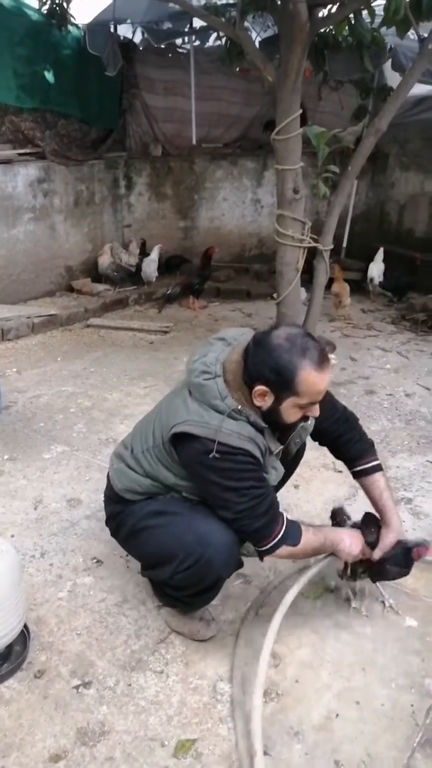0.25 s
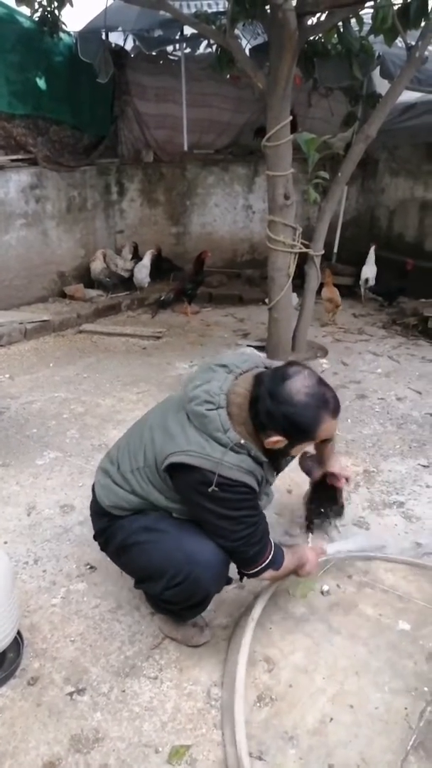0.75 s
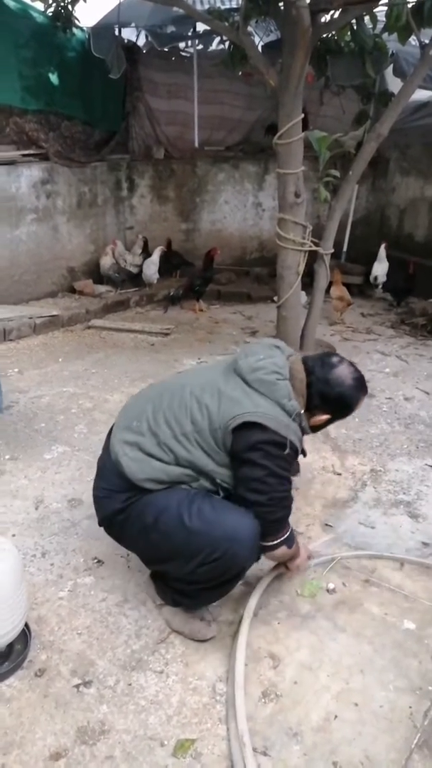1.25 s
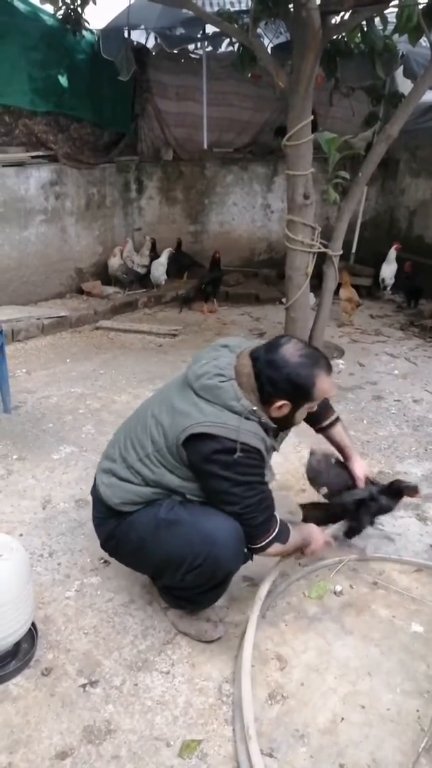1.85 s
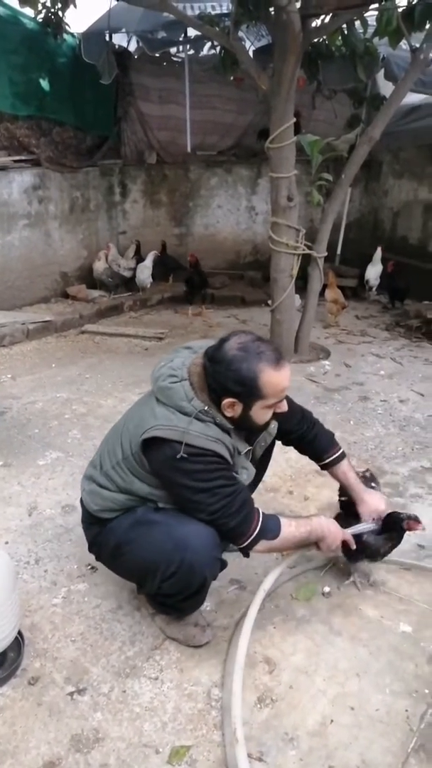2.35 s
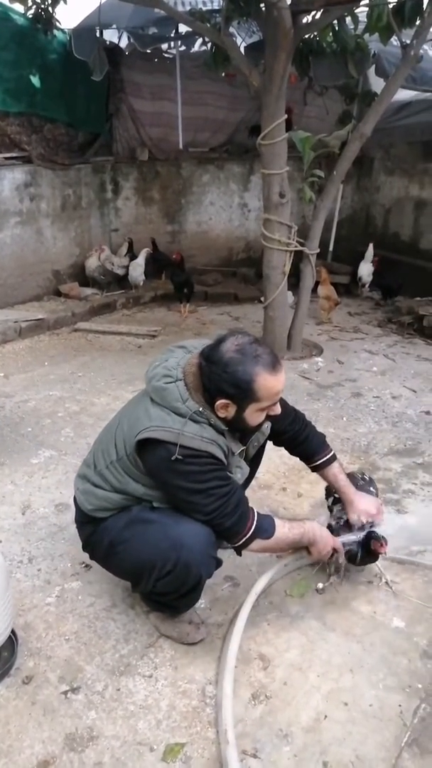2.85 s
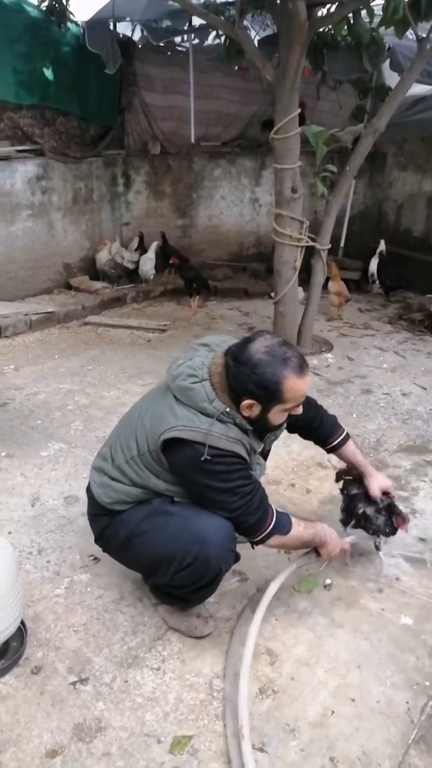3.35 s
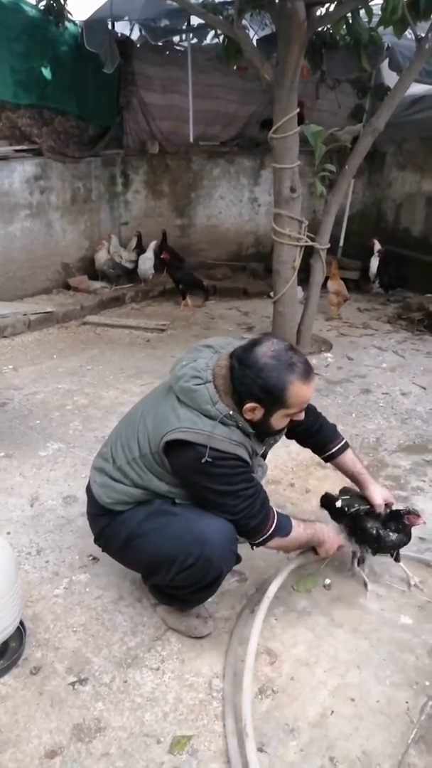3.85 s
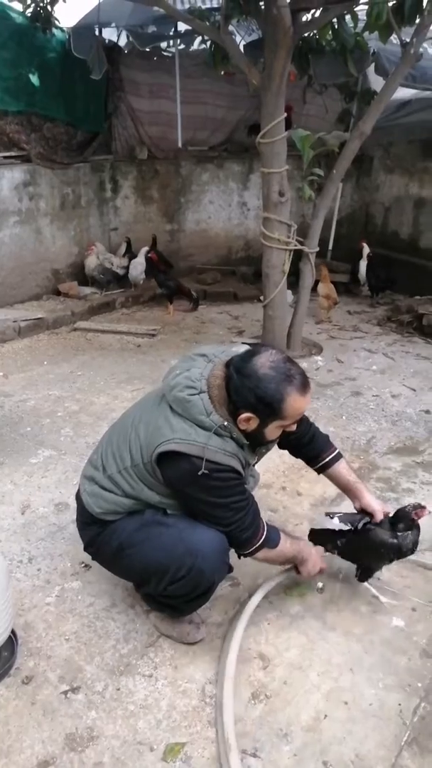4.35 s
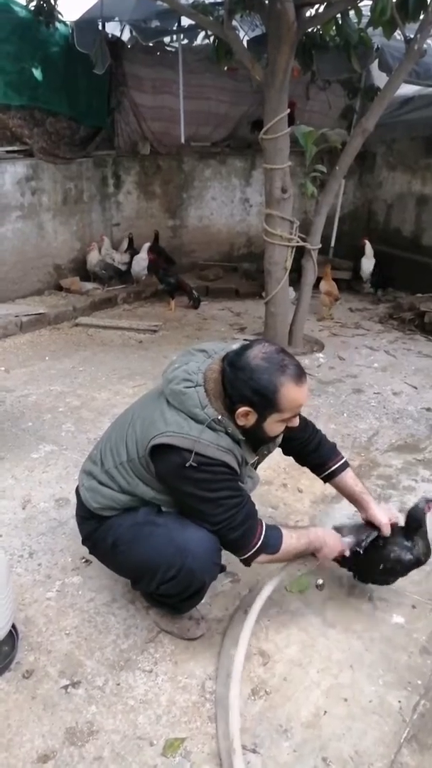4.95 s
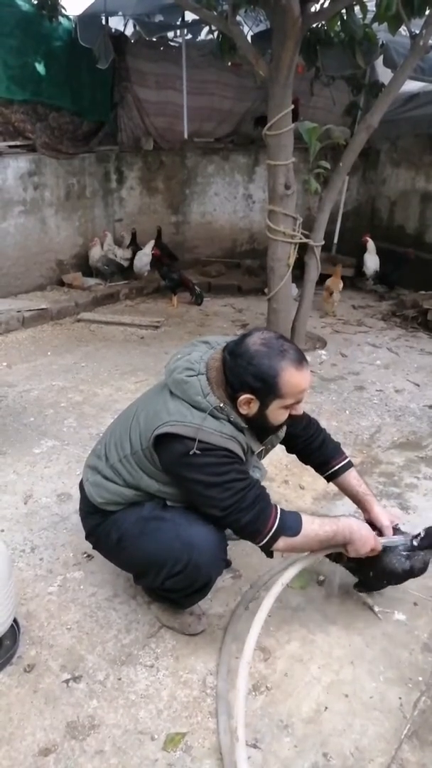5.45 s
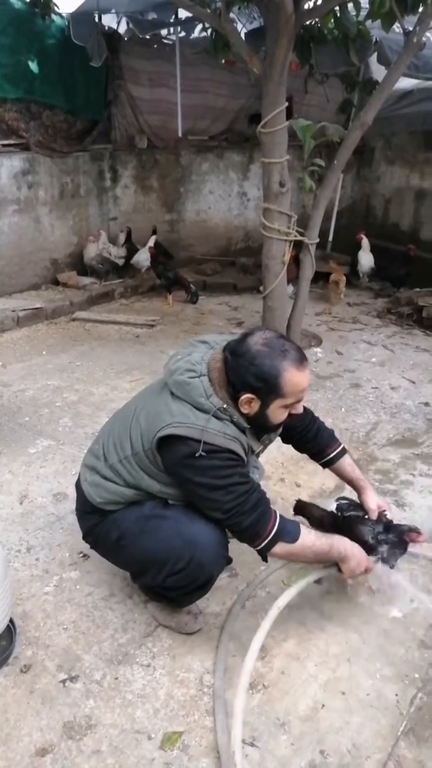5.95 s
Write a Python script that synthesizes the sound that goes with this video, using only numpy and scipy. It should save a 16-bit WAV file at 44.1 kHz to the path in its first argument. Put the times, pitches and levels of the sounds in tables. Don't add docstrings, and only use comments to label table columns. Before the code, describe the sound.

In a small walled yard, a hen close to the microphone squawks loudly, clucks in quick runs and squawks again, rough and rattling. A hose jet hisses throughout, swelling into brief spatters on concrete. Drops crack, wet squirts squeak, more hens call softly further off, and distant traffic rumbles below.

```python
import sys
import numpy as np
from scipy import signal
from scipy.fft import rfft, irfft, next_fast_len
from scipy.io import wavfile

SR = 44100
rng = np.random.default_rng(int(sys.argv[2]) if len(sys.argv) > 2 else 0)


def rack_gain(trim_db):
    fader = np.asarray(trim_db, float)
    return 10 ** (fader / 20)


def int16_out(signal):
    q = np.round(np.clip(np.atleast_2d(signal).T, -1, 1) * 32767)
    wavfile.write(sys.argv[1], SR, q.astype(np.int16))


N = 273861

# time_s, effort_db, pitch_hz, beak_gape_db
SQUAWKS = [
    [(0.58, -41, 586, -16), (0.605, -64, 652, -18), (0.63, -41, 655, -2), (0.7, -37, 653, -1),
     (0.78, -39, 660.7, 2.5), (0.845, -38, 647, -7)],
    [(1.15, -64, 535.4, -2), (1.22, -51, 512, 0.5), (1.3, -53, 532.7, 5.5), (1.37, -48.5, 517, 5.5),
     (1.45, -51.5, 506.7, -17)],
    [(2.07, -48.5, 578, 10.5), (2.13, -46, 562.7, 2), (2.18, -42, 494, 6), (2.22, -43.5, 550, -3.5),
     (2.27, -44, 563, 2), (2.315, -47.5, 474, -16)],
    [(2.985, -48, 670, -19), (3.02, -40, 625, -21), (3.1, -40.5, 594, -12), (3.2, -36.5, 584, -8),
     (3.35, -38, 630.3, 11), (3.44, -36, 627, 2), (3.52, -53, 584, -6)],
    [(4.32, -70, 559, -8), (4.34, -42, 554, -18), (4.4, -44, 542, 3.5), (4.52, -44.5, 558.7, 8),
     (4.61, -43, 579.7, -19), (4.655, -53, 592, -19)],
    [(6.06, -41, 575, -34), (6.09, -39.5, 709.5, 2.5), (6.15, -42, 670, 4), (6.21, -40, 602, -1.5)],
]
SQUAWK_HOARSENESS = [.55, .28, .6, .45, .25, .3]
# throat_over_chest_db, beak_over_chest_db, beak_hz, shrill_under_beak_db
SQUAWK_TRACT = [(7.5, 12, 2480, -26), (12.5, 16, 2050, -9.5), (8.5, -2.5, 2280, -14), (1, 0, 2140, -28),
                (7.5, -0.5, 2200, -21.5), (6.5, 8, 2290, -46)]
# beak_width_below_hz, beak_width_above_hz, whistle_over_shrill_db, upper_beak_db
SQUAWK_COLOUR = [(280, 200, 0, -20), (170, 350, -34, -10), (600, 400, -18, -12), (600, 400, 3, -12),
                 (260, 250, -12, -20), (500, 400, -10, -14)]
# rate_per_s, one_pulse_s, level_swing_db, pitch_swing_share, every_other_pulse_db, uneven_rad
SQUAWK_RATTLE = [(51.5, .726, 4.5, .05, 0.1, .35), (45, 1.305, 3.0, .012, 0.1, .8),
                 (40, 2.18, 5.0, .05, 0.1, 1.0), (55, 3.347, 5.0, .04, 0.1, .6),
                 (46, 4.502, 6.5, .03, 2.5, .25), (46.5, 6.166, 4.5, -.09, 0.1, .25)]
REST_COLOUR = (560, 380, -6, -15)
REST_RATTLE = (47, 0.0, 4.5, .035, 0.1, .8)

# peak_s, chest_db, pitch_hz, throat_over_chest_db, beak_over_chest_db
CLUCKS = [(0.183, -37, 612, 11, 2.5), (.63, -47, 736, 16.5, 12), (.872, -47.5, 493, 13, 20.5),
          (.897, -48, 487.4, 18, 20.5), (1.617, -27.5, 461, -3.5, -2.5), (1.728, -31.5, 550, 7, 4),
          (1.892, -27, 547.3, 5.5, 0.5), (2.025, -34, 597.3, 9.5, 7.5), (2.339, -28.5, 475.7, -1, -9.5),
          (2.835, -39, 782, -46, -42), (2.866, -34.5, 764, -17, -28), (3.752, -36, 598, -34, -18),
          (4.09, -36, 477.5, -40, -40), (4.248, -37, 530, 10.5, -6), (4.311, -40.5, 542, 12.5, -3),
          (4.68, -36.5, 568, 2.5, 3.5), (4.745, -33.5, 654.4, 1, 7), (4.803, -34.5, 701, 6, 6.5),
          (4.862, -42.5, 485, 14, 10.5), (4.979, -33.5, 691, 12, 2), (5.01, -45, 590.5, 20.5, 6.5),
          (5.952, -41, 695.5, 10, 5.5), (5.972, -33, 693.6, 0, -4), (5.985, -53, 560, 16, 1)]
CLUCK_HOARSENESS = [.55, .3, .5, .35, .55, .55, .55, .45, .3, .4, .35, .55, .7, .35, .5, .3, .6, .65, .65,
                    .65, .7, .2, .2, .2]
CLUCK_BEAK_HZ = [2350, 2580, 2470, 1826, 2450, 2160, 2260, 2350, 2335, 2335, 2335, 2335, 2335, 2100, 2335,
                 2160, 2360, 2200, 2335, 2100, 2335, 2750, 2060, 2335]
YELPS = [
    (0.114, -58, 638, 30.5, 14.5),
    (4.159, -55.5, 571, 28.5, -9),
    (5.459, -53.5, 572, 29.9, 0),
]
YELP_HOARSENESS = 0.36

# start_s, length_s, chest_db, pitch_hz, throat_over_chest_db
OTHER_HEN = [(1.23, 0.2, -45, 688, 5), (1.45, 0.17, -48, 588, 8.5), (1.63, 0.59, -46, 670, 2),
             (4.35, .33, -38.5, 670, -8), (4.72, 0.24, -44, 710, 8), (2.52, 0.064, -64, 740, 18),
             (2.54, 0.29, -75, 370, -38), (3.82, 0.34, -54, 530, -17), (3.74, .12, -101, 784, 13),
             (4.2, 0.183, -63, 817, -11), (1.07, 0.11, -61.5, 480, 1), (.15, 0.105, -42, 700, -8),
             (5.5, 0.13, -52, 710, -3), (2.36, 0.078, -53.5, 470, 0), (3.0, 0.315, -55, 830, -13)]
OTHER_BEAK_DB = [8.5, 6, -4.5, -4, -17, 12, -12, -14.5, 10, 11.5, 11.5, -15, -18, -4, -6]
OTHER_BEAK_HZ = [2750, 2350, 2335, 2100, 2335, 2335, 2335, 2335, 2335, 2460, 2335, 2335, 2335, 2335, 2335]
OTHER_HOARSENESS = [.5, .5, .8, .45, .6, .95, .15, .85, .3, .3, .95, .6, .9, .25, .7]

# rise_s, rise_db, hold_s, hold_loss_db, fall_s, fall_loss_db
CLUCK_SHAPE = (.014, 11, 0.013, 7.0, 0.045, 15)
YELP_SHAPE = (.02, 7.0, .04, -13.0, .022, 14.0)
MURMUR_SHAPE = (.03, 4.6, 0.707, 0.82, 0.31, 6.6)
# throat_hold_db, throat_fall_db, beak_hold_db, beak_fall_db
CLUCK_CLOSING = (2.0, 6.5, 5, 20)
YELP_CLOSING = (20.0, 8.0, 12.0, 8.0)
CLUCK_ARCH = (.1, .04, .16)
YELP_ARCH = (-.01, .15, .26)
MURMUR_ARCH = (.02, .0, .02)

# time_s, level_db
JET = [(0, -44.5), (.3, -42), (.6, -41), (.9, -47.5), (1.14, -38), (1.45, -45.5), (1.8, -49.5), (2.2, -42),
       (2.36, -45), (2.6, -39.5), (3.1, -41.5), (3.55, -38), (4.18, -44), (4.4, -42.5), (4.64, -48),
       (5.1, -45.5), (5.5, -46), (6.21, -42)]
# time_s, half_length_s, spatter_db, spray_db
SWEEPS = [(0.006, 0.045, 10.5, 6.5), (0.198, 0.09, 11, 10), (0.48, 0.095, 7, 1.5), (0.623, 0.026, 9.5, -3),
          (0.788, 0.14, 1, 4.5), (0.969, 0.032, 6.5, 11), (1.152, 0.044, 6, 3), (1.3, 0.066, -4, -7),
          (1.376, 0.06, 7, 1), (1.596, 0.09, 7, 6.5), (1.728, 0.05, 12, 1), (1.905, 0.033, 9, 2),
          (2.03, 0.038, 14.5, 9), (2.247, 0.047, 6, 6), (2.587, 0.032, 5.5, 9), (4.252, 0.0075, -5, -8),
          (4.747, 0.036, 8, 12.5), (4.855, 0.054, 6, 5), (5.323, 0.15, 11.5, 12), (5.383, 0.024, -9.5, -13),
          (5.438, 0.038, -8, -2), (5.733, 0.13, 8, 14), (5.864, 0.094, -4, -3.5), (6.023, 0.091, 10.5, 14)]
# frequency_hz, level_db_per_hz
SPATTER = [(900, -10.5), (1400, -10), (1900, -7), (2500, -1.5), (3200, -1.5), (4200, -8), (5100, -4),
           (6000, 12.5), (7000, -4.5), (8300, -5.5), (9000, -22)]
SPRAY = [(8300, -30), (9500, 1), (10800, -13), (12000, -4), (13800, -14.5), (14900, -5.5), (15500, -5.5),
         (16000, -10)]
# time_s, peak_db, sharpness_db
DROPS = [(0.076, -53, -33), (0.16, -23, -28), (0.607, -40, -56), (0.9477, -33.5, 8), (1.2445, -31, -45),
         (1.9008, -31, -29), (2.021, -33, -29), (2.4315, -29.5, -30), (2.5438, -34, -18),
         (2.6212, -28, -29), (3.588, -39, -20), (3.647, -46, -20), (4.714, -42, -21), (4.794, -52, -34),
         (5.0777, -33.5, -20), (5.267, -25, -20), (5.6717, -29, -11), (5.992, -46, -25),
         (6.055, -24.5, -31)]
# time_s, length_s,
# start_hz, end_hz, level_db
SQUIRTS = [(0.041, 0.023, 3250, 3300, -37), (2.81, 0.063, 3000, 5000, -41), (4.79, 0.1, 4800, 5150, -42.5),
           (0.598, 0.018, 5900, 4500, -42), (5.635, 0.0257, 2600, 1300, -52),
           (3.89, 0.091, 2800, 2600, -53.5), (4.78, 0.078, 3900, 4300, -43),
           (3.745, 0.024, 422, 374, -45.5), (4.07, 0.0468, 530, 295, -43), (3.1, 0.0593, 560, 600, -52.5),
           (3.15, 0.057, 460, 510, -42.5), (.97, .03, 348, 175, -51.5), (4.6, 0.0205, 1750, 1550, -53),
           (.065, .05, 4600, 5050, -40), (0.066, .045, 3950, 4350, -41.5), (0.027, 0.026, 5000, 4850, -45),
           (5.928, .012, 1040, 1080, -37), (4.44, 0.124, 4200, 4200, -54), (.61, 0.0058, 1640, 1500, -24),
           (5.966, 0.0223, 1370, 1060, -33)]
SQUIRT_WIDTHS_HZ = [120, 500, 130, 90, 220, 350, 450, 40, 40, 50, 30, 30, 90, 160, 130, 150, 60, 300, 25,
                    25]

# frequency_hz, level_db_per_hz
RUMBLE = [(12, -39), (20, -1), (97, 2), (141, 4), (195, -5), (394, -2), (501, -5.5), (730, -7.5),
          (809, -14.5), (1200, -11), (1560, -16.5), (2640, -120)]
# time_s, level_db
PUMP = [
    (0, -50),
    (1.0, -62),
    (1.95, -51),
    (2.1, -99),
    (3.8, -104),
    (3.95, -43),
    (4.4, -52),
    (5.5, -48),
    (6.21, -52.5),
]
# time_s, firing_hz, level_db
ENGINES = [
    [(0.0, 139, -51), (0.88, 152.4, -54.5), (1.0, 133, -48)],
    [(0.95, 129.4, -62), (1.366, 129.6, -47.5), (2.35, 136.5, -54.5)],
    [(2.6, 149, -78), (2.734, 133.3, -65), (3.5, 150.8, -61)],
    [(3.7, 153, -59), (3.938, 150.3, -55), (4.3, 123, -52.5)],
]

# frequency_hz, left_over_right_db
PORTS = [(70, -0.5), (99, -1), (160, -0.5), (270, -2), (450, 1.5), (740, -4.5), (1220, -1.5), (2010, -10),
         (3330, -5), (5500, -15), (9080, 0.5), (15000, -19)]
# frequency_hz, likeness_0_to_1
LIKENESS = [(60, 1), (300, 1), (700, 0.96), (1200, 0.4), (3000, 0), (5500, 0.06), (9000, 0), (15000, 0.37)]

BEAK_REST_HZ, CLUCK_SHRILL_DB = 2335, -21.5
THROAT_REST_HZ, THROAT_FOLLOWS = 1180, 0.53
GAPE_RAISES_HZ = 16
SPRAY_UNDER_DB, SPRAY_FOLLOWS = 13.5, 0.87
RUMBLE_DB, PUMP_HZ = -55, 100.6
YARD_T60_S, WALL_CUT_HZ, YARD_DB = 0.2, 8800, -5
LEFT_LAG = 6
TOP_HZ = 15760


def hens():
    out = np.zeros(N)
    for voice in [*squawks(), *clucks_and_yelps(), *far_murmurs()]:
        first, sound = call(*voice)
        out[first:first + len(sound)] += sound
    return signal.sosfilt(signal.butter(5, 480, "high", fs=SR, output="sos"), out + 1e-18)


def squawks():
    calls = zip(SQUAWKS, SQUAWK_TRACT, SQUAWK_HOARSENESS, SQUAWK_COLOUR, SQUAWK_RATTLE)
    return [(squawk_rows(rows, *tract[:3]), hoarse, tract[3], colour, rattle)
            for rows, tract, hoarse, colour, rattle in calls]


def clucks_and_yelps():
    rest = CLUCK_SHRILL_DB, REST_COLOUR, REST_RATTLE
    voices = []
    for row, beak_hz, hoarse in zip(CLUCKS, CLUCK_BEAK_HZ, CLUCK_HOARSENESS):
        rows = shaped_rows(*row, beak_hz, CLUCK_SHAPE, CLUCK_CLOSING, CLUCK_ARCH)
        voices.append((rows, hoarse, *rest))
    for row in YELPS:
        rows = shaped_rows(*row, BEAK_REST_HZ, YELP_SHAPE, YELP_CLOSING, YELP_ARCH)
        voices.append((rows, YELP_HOARSENESS, *rest))
    return voices


def far_murmurs():
    voices = []
    calls = zip(OTHER_HEN, OTHER_BEAK_DB, OTHER_BEAK_HZ, OTHER_HOARSENESS)
    for (s, length_s, db, hz, throat_db), beak_db, beak_hz, hoarse in calls:
        rows = shaped_rows(s, db, hz, throat_db, beak_db, beak_hz,
                           MURMUR_SHAPE, np.zeros(4), MURMUR_ARCH, length_s)
        voices.append((rows, hoarse, CLUCK_SHRILL_DB, REST_COLOUR, REST_RATTLE))
    return voices


def squawk_rows(rows, throat_db, beak_db, beak_hz):
    return [(s, db, throat_db, beak_db + gape, hz, beak_hz + GAPE_RAISES_HZ * gape)
            for s, db, hz, gape in rows]


def shaped_rows(s, db, hz, throat_db, beak_db, beak_hz, shape, closing, arch, stretch=1):
    rise_s, rise_db, hold_s, hold_db, fall_s, fall_db = shape
    times = s + np.cumsum([-rise_s, rise_s, hold_s * stretch, fall_s * stretch])
    chest = db - np.array([rise_db, 0, hold_db, hold_db + fall_db])
    throat = throat_db - np.cumsum([0, 0, closing[0], closing[1]])
    beak = beak_db - np.cumsum([0, 0, closing[2], closing[3]])
    pitch = hz * (1 - np.insert(arch, 1, 0))
    return np.transpose([times, chest, throat, beak, pitch, np.full(4, beak_hz)])


def call(rows, hoarse, shrill_db, colour, rattle):
    rattle_hz, pulse_s, swing_db, wobble, pair_db, uneven = rattle
    first, t, gate = span(rows[0][0], rows[-1][0], 0.0079, 0.013)
    chest_db, throat_db, beak_db, pitch, beak_hz = in_time(rows, t)
    since = t - t[0]
    broken = np.clip(0.25 + since / 0.04, 0, 1)
    hoarse = hoarse * broken
    pitch = pitch * (1 - 0.0663 * np.exp(-since / 0.00744))

    flutter = 2 * np.pi * rattle_hz * (t - pulse_s) + uneven * drift(9.86, len(t))
    jitter = hoarse * 0.0253 * drift(28.5, len(t))
    turn = 2 * np.pi * np.cumsum(pitch * (1 + broken * wobble * np.cos(flutter) + jitter)) / SR
    throb = rack_gain(broken * (swing_db * np.cos(flutter) + pair_db * np.cos(flutter / 2)))

    out = 0
    for k in np.arange(2, 33) / 2:
        gain = tract(k * pitch, pitch, throat_db, beak_db, beak_hz, shrill_db, colour)
        spread_hz = 65 * np.sqrt(k)
        scatter = (drift(spread_hz, len(t)) + 1j * drift(spread_hz, len(t))) / np.sqrt(2)
        if k % 1 == 0:
            size = np.sqrt(1 - hoarse) + np.sqrt(hoarse) * scatter
        else:
            size = 1.38 * hoarse * scatter
        out = out + gain * np.real(size * np.exp(1j * k * turn))
    return first, out * throb * gate * rack_gain(chest_db + 4.0)


def tract(hz, pitch, throat_db, beak_db, beak_hz, shrill_db, colour):
    below_hz, above_hz, whistle_db, upper_db = colour
    throat_hz = THROAT_REST_HZ + THROAT_FOLLOWS * (2 * pitch - THROAT_REST_HZ)
    chest = cavity(hz, 700, 260, 240)
    throat = rack_gain(throat_db) * cavity(hz, throat_hz, 400, 230)
    whistle = rack_gain(whistle_db) * cavity(hz, 7890, 570, 540)
    top = cavity(hz, 5330, 850, 1000) + whistle + rack_gain(-8.0) * cavity(hz, 4070, 1500, 480)
    upper_beak = rack_gain(upper_db) * cavity(hz, 3193, 160, 163)
    beak = cavity(hz, beak_hz, below_hz, above_hz) + rack_gain(shrill_db) * top + upper_beak
    return chest + throat + rack_gain(beak_db) * beak


def cavity(hz, centre_hz, below_hz, above_hz):
    width_hz = np.where(hz < centre_hz, below_hz, above_hz)
    return 1 / (1 + ((hz - centre_hz) / width_hz) ** 2) ** 2


def jet():
    spatter_db, spray_db = jet_levels()
    sizes = rack_gain(3.12 * np.minimum(rng.exponential(1, (2, 2, N)), 6)) * rng.choice([-1, 1], (2, 2, N))
    impacts = rms_one(sizes * (rng.random((2, 2, N)) < 2600 / SR))
    source = impacts + 0.45 * rng.standard_normal((2, 2, N))
    wobble = drift(17.6, N)
    spatter = rack_gain(spatter_db - 4.5) * banded(SPATTER, source, wobble, patchy_db=3.0, count=4)
    spray = rack_gain(spray_db - 2.5) * banded(SPRAY, source, wobble, patchy_db=3.0, count=9)
    return spatter + spray


def jet_levels():
    t = np.arange(N) / SR
    spatter_db, = in_time(JET, t)
    usual_db = spatter_db.mean()
    spray_db = usual_db - SPRAY_UNDER_DB + SPRAY_FOLLOWS * (spatter_db - usual_db)
    for s, half_s, hard_db, fine_db in SWEEPS:
        swell = np.exp(-((t - s) / half_s) ** 2)
        spatter_db = spatter_db + hard_db * swell
        spray_db = spray_db + fine_db * swell
    return spatter_db, spray_db


def drops():
    dull, sharp = np.zeros((2, N))
    dying = np.exp(-np.arange(800) / SR / 0.0035)
    for (s, peak_db, sharp_db), crack in zip(DROPS, rng.standard_normal((len(DROPS), 800))):
        first = int(s * SR)
        dull[first:first + 800] += rack_gain(peak_db + 5.0) * (crack * dying)[:N - first]
        sharp[first:first + 800] += rack_gain(peak_db + sharp_db - 23) * (crack * dying ** 2)[:N - first]
    body = signal.sosfilt(signal.butter(2, [4600, 7000], "band", fs=SR, output="sos"), dull + 1e-18)
    edge = signal.sosfilt(signal.butter(2, 8500, "high", fs=SR, output="sos"), sharp + 1e-18)
    return body + edge


def squirts():
    out = np.zeros(N)
    for (s, length_s, start_hz, end_hz, level_db), width_hz in zip(SQUIRTS, SQUIRT_WIDTHS_HZ):
        first, t, gate = span(s, s + length_s, 0.0018, 0.011)
        turn = 2 * np.pi * np.cumsum(np.interp(t, [s, s + length_s], [start_hz, end_hz])) / SR
        noise = drift(width_hz, len(t)) * np.cos(turn) + drift(width_hz, len(t)) * np.sin(turn)
        out[first:first + len(t)] += rack_gain(level_db + 3.5 * drift(60, len(t))) * gate * noise
    return out


def yard(x):
    t = np.arange(int(0.5 * SR)) / SR
    hits = rng.standard_normal((3, len(t))) * (rng.random((3, len(t))) < 0.1)
    shared, *own = hits * rack_gain(-60 * t / YARD_T60_S) * (t > 0.003)
    apart = signal.sosfilt(signal.butter(1, 700, "high", fs=SR, output="sos"), own)
    echoes = apart + signal.sosfilt(signal.butter(1, 700, fs=SR, output="sos"), shared)
    echoes = signal.sosfilt(signal.butter(1, WALL_CUT_HZ, fs=SR, output="sos"), echoes)
    echoes = echoes / np.sqrt(np.sum(echoes ** 2) / 2)
    return signal.fftconvolve(x[None], echoes, axes=1)[:, :N]


def hums():
    t = np.arange(N) / SR
    out = rack_gain(in_time(PUMP, t)[0] + 0.5 + 2.5 * drift(6, N)) * np.sin(2 * np.pi * PUMP_HZ * t)
    for rows in ENGINES:
        first, t, gate = span(rows[0][0], rows[-1][0], 0.057, 0.011)
        hz, level_db = in_time(rows, t)
        tone = np.sin(2 * np.pi * np.cumsum(hz) / SR)
        out[first:first + len(t)] += rack_gain(level_db + 2.0 + 4.3 * drift(46, len(t))) * gate * tone
    return out


def traffic_rumble():
    noise = rng.standard_normal((2, 2, N))
    return rack_gain(RUMBLE_DB + 2.5) * banded(RUMBLE, noise, drift(2.2, N), patchy_db=1.3, count=2)


def banded(spectrum, source, together, patchy_db, count):
    out = 0
    low_hz, high_hz = spectrum[0][0], spectrum[-1][0]
    edges = low_hz * 2 ** np.arange(0, np.log2(high_hz / low_hz) + 0.01, 1 / count)
    for k, (low, high) in enumerate(zip(edges, edges[1:])):
        band = signal.butter(2, [low, high], "band", fs=SR, output="sos")
        mid, side = signal.sosfilt(band, source[k % 2])
        hz = np.sqrt(low * high)
        alike = np.clip(at_hz(LIKENESS, hz), 0, 1)
        flicker_db = patchy_db * (0.7 * together + 0.7 * drift(14, N))
        gain = rack_gain(at_hz(spectrum, hz) + flicker_db)
        apart = np.array([side, np.roll(side, N // 3)])
        out = out + gain * (np.sqrt(alike) * mid + np.sqrt(1 - alike) * apart)
    return rms_one(out)


def rms_one(x):
    return x / np.sqrt(np.mean(np.abs(x) ** 2) + 1e-20)


def in_time(rows, t):
    s, *columns = np.transpose(rows)
    return [np.interp(t, s, c) for c in columns]


def at_hz(points, hz):
    point_hz, value = np.transpose(points)
    return np.interp(np.log(hz + 1e-9), np.log(point_hz), value)


def drift(rate_hz, size):
    r = np.exp(-2 * np.pi * rate_hz / SR)
    noise = rng.standard_normal(size + 9000)
    return rms_one(signal.lfilter([1], [1, -2 * r, r * r], noise)[9000:])


def span(t0, t1, rise_s, fall_s):
    first = int(t0 * SR)
    t = np.arange(first, min(int((t1 + fall_s) * SR), N)) / SR
    gate = np.clip((t - t0) / rise_s, 0, 1) * np.clip((t1 + fall_s - t) / fall_s, 0, 1)
    return first, t, np.sin(gate * np.pi / 2) ** 2


def scene():
    near = hens() + drops() + squirts()
    hum = hums()
    hum_from_one_side = np.array([np.roll(hum, 20), hum])
    return near + rack_gain(YARD_DB) * yard(near) + jet() + traffic_rumble() + hum_from_one_side


def roll_off(x):
    return signal.sosfilt(signal.butter(12, 16800, fs=SR, output="sos"), x)


def record(dry):
    size = next_fast_len(N + 4096)
    hz = np.fft.rfftfreq(size, 1 / SR)
    tilt = rack_gain(at_hz(PORTS, hz) / 2 * np.array([[1], [-1]]))
    late = np.exp(-2j * np.pi * hz * LEFT_LAG / SR * np.array([[1], [0]]))
    top = 1 / (1 + (hz / TOP_HZ) ** 200)
    mix = irfft(rfft(dry, size) * tilt * late * top, size)[:, :N]
    return roll_off(mix)


dry = scene()
out = record(dry)
int16_out(out)
```